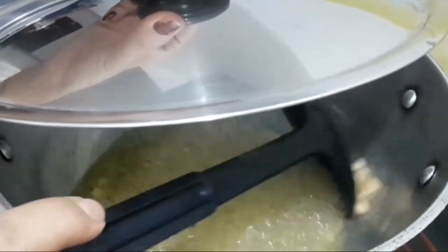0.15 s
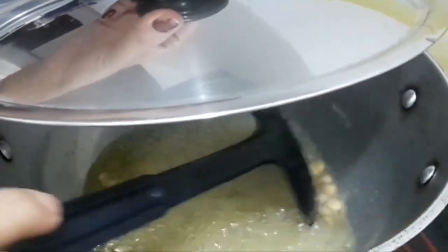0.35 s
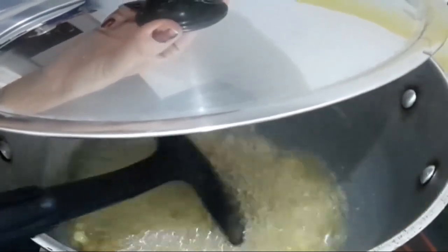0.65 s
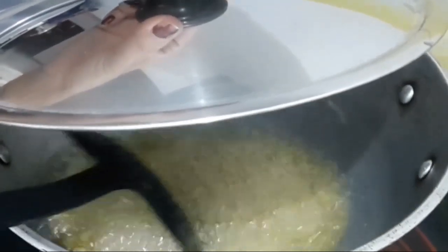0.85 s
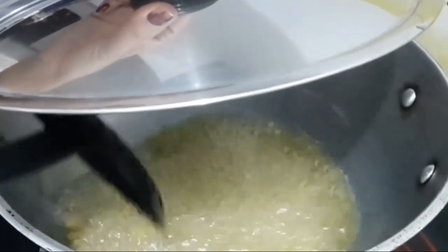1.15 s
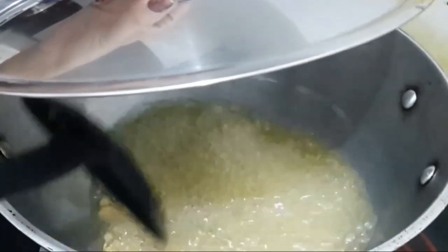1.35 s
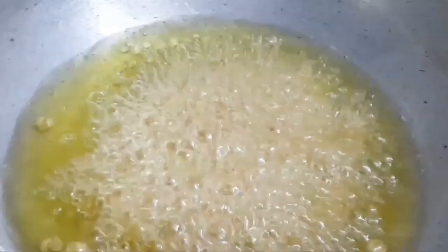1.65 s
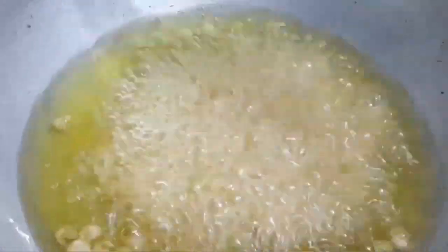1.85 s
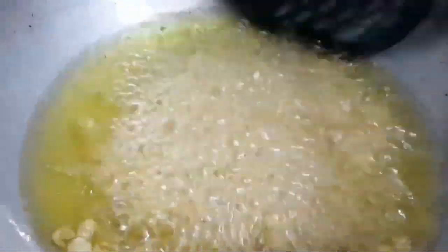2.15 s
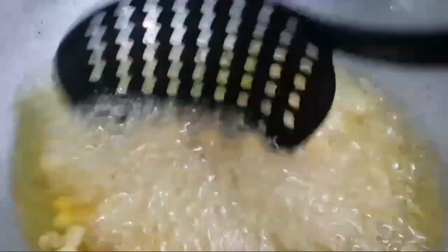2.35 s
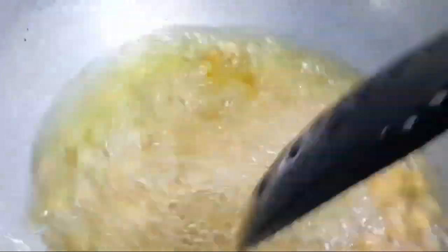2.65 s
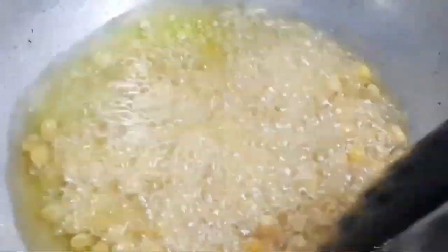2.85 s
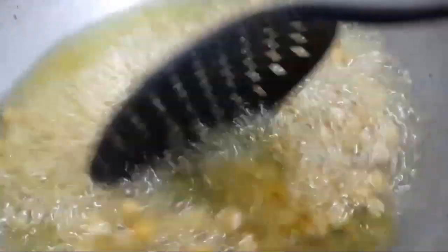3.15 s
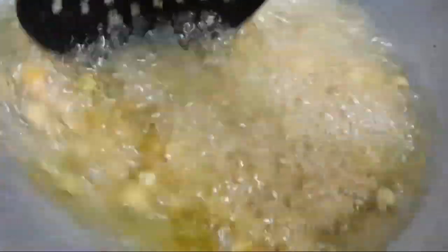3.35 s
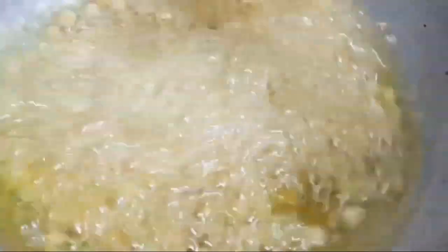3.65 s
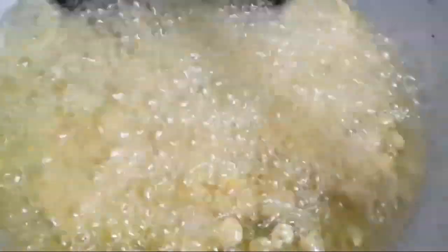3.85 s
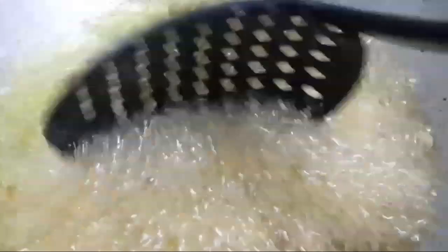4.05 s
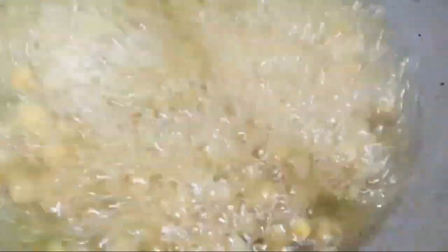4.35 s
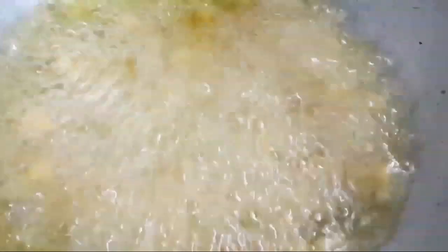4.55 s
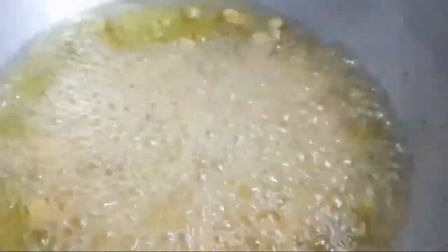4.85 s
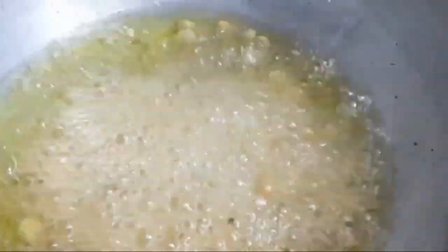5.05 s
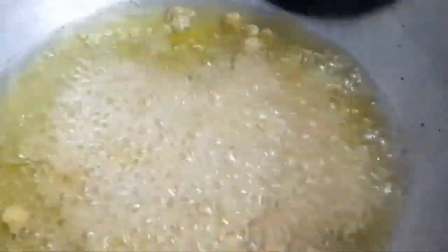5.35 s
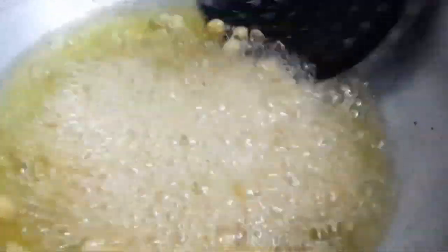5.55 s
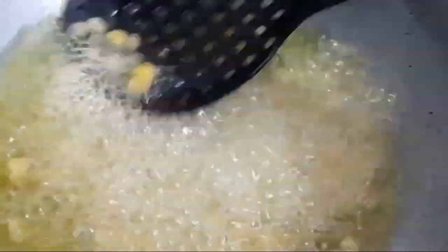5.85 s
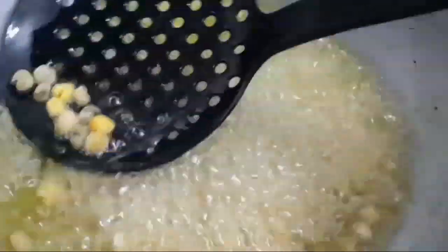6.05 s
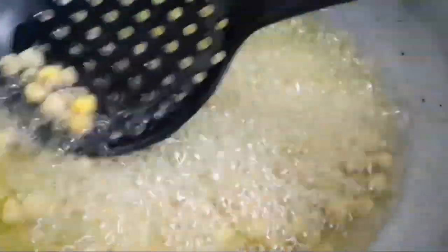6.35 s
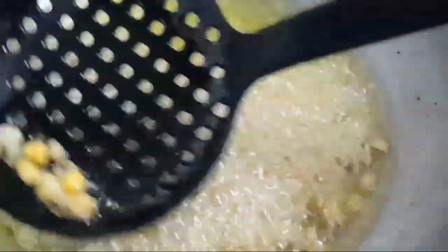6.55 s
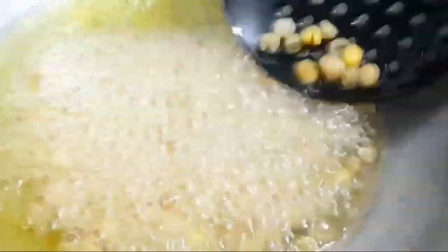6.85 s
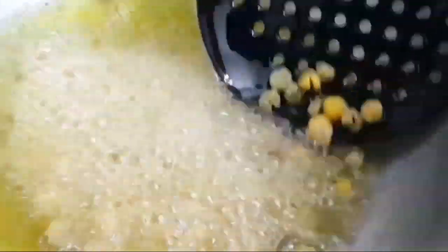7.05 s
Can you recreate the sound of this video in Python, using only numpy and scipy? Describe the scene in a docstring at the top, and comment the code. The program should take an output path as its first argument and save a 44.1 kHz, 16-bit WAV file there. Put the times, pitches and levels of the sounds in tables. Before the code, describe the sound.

From the start, small legumes deep-fry under the raised lid of a steel pot, close to the microphone and toward the left: a dense, rushing sizzle over hollow, low glugs. A spoon drags splashily through the oil in the first half second. At about 1.8 seconds the sound cuts to silence.

From 2 seconds the open pot fades in, much quieter, with a finer, brighter fizz. A plastic spoon ticks once against the steel near 2.3 seconds. Around 3.5 seconds the frying grows into a rolling crackle, still softer than the opening, dotted with tiny ringing pops, sharp spitting clicks and occasional oil plops. Stirring raises short sputters near 2.7 seconds, from 3.6 to 4, and most strongly from 5.5 to 5.9. The sizzle dips just after 6 seconds, then swells until the end at about 7.2. A very faint, low kitchen drone lies beneath the open pot.

```python
"""First, a dense rush over hollow glugs: small legumes deep-frying under the raised lid of a steel pot,
close to the left microphone port. The sound cuts to silence and fades back in on the open pot, where a
slotted spoon stirs the foam: steam bubbles fizz, larger ones pop and ring, water droplets spit.
One frying strength drives the fizz, the boil and the chance bursts; the loudest bursts have set times.
Behind the stove, the kitchen drones faintly."""
import sys
import numpy as np
from scipy import signal
from scipy.fft import rfft, irfft, next_fast_len
from scipy.io import wavfile
from scipy.ndimage import map_coordinates

SR = 44100
rng = np.random.default_rng(int(sys.argv[2]) if len(sys.argv) > 2 else 0)


def to_wav(s):
    """Save 16-bit WAV."""
    ch = np.atleast_2d(s).T  # columns
    pcm = np.round(np.clip(ch, -1, 1) * 32767)  # PCM
    wavfile.write(sys.argv[1], SR, pcm.astype(np.int16))


N = 317961
COVERED_S, OPEN_S = (0, 1.8), (2.1, 7.2)  # start and end of each spell of frying

# Frying strength under the lid, highest as the spoon sweeps through: (time [s], level [dB])
LID_STRENGTH = [(0, -23), (.12, -25), (.29, -22), (.39, -28), (.415, -24.5), (.48, -25.5), (.57, -26.5),
                (.75, -28), (1.07, -26), (1.17, -28), (1.4, -27.5), (1.77, -26.5)]
# Colour of the small bubbles under the lid, from close by: (frequency [Hz], gain [dB])
LID_FIZZ_COLOUR = [(1180, -33.5), (2000, -11.5), (2700, -7.5), (3670, -6.5), (5000, -3), (6900, 4),
                   (7600, -1), (8700, -8.5), (10500, -14.5), (15500, -18.5)]
# Colour of the large bubbles under the lid: (frequency [Hz], gain [dB])
LID_BOIL_COLOUR = [(15, -46.5), (25, -29), (117, -15.5), (172, -13.5), (208, -26.5), (248, -15.5),
                   (390, -11.5), (486, -7), (535, 1), (612, -2.5), (787, -8), (883, -15.5), (1050, -13.5),
                   (1270, -12.5), (1490, -3), (2500, -15.5), (3250, -56), (5500, -120)]
# Air resonances between oil and lid: (frequency [Hz], width [Hz], gain [dB])
LID_AIR_MODES = [(401, 37, -11), (558.5, 13, 3.5), (622, 40, 2.5), (790, 90, -3), (1294, 57, 1),
                 (1440, 25, -14.5), (1643, 18, 1.5)]
def under_lid():
    """Close on the covered pot: a dense rush over a hollow boil, and one sweep of the spoon."""
    strength_db, = curves(LID_STRENGTH)
    mean_db = strength_db[:round(COVERED_S[1] * SR)].mean()
    fizz_db = strength_db - 0.6 + 1.2 * wobble(13.75)
    boil_db = -38.5 + 0.42 * (strength_db - mean_db)
    rush = fizz(LID_FIZZ_COLOUR, rate=13000, spread_db=4, clump_db=1.7,
                snap_rate=690, snaps_db=-2, crackle_db=-13, comb_db=-5.5)
    hollow = boil(LID_BOIL_COLOUR, LID_AIR_MODES, rate=2500, spread_db=1.5, clump_db=1.3, modes_db=-1.5)
    return amp(fizz_db) * rush + amp(boil_db) * hollow + spoon_sweep()


# Frying strength in the open pot, up with stirring, down as food is lifted out: (time [s], level [dB])
OPEN_STRENGTH = [(2.24, -48.5), (2.42, -45.5), (2.9, -44.5), (3.08, -44), (3.278, -44), (3.53, -36.8),
                 (4.1, -36), (4.65, -35), (4.9, -36.5), (5.0, -38), (5.52, -35.5), (5.6, -38),
                 (5.76, -35.5), (5.82, -39.5), (6.15, -41.5), (6.47, -41), (6.6, -36.5), (6.87, -38),
                 (7.2, -33)]
# Colour of the small bubbles, open to the microphone: (frequency [Hz], gain [dB])
OPEN_FIZZ_COLOUR = [(1180, -25), (2000, -11), (2480, -6.5), (3400, -5), (3900, -3.5), (4550, -6.5),
                    (5220, -6), (7000, -3.5), (8100, -0.5), (8900, -2.5), (10150, 2.5), (11100, -3),
                    (12300, -8.5), (15500, -16.5)]
# Colour of the large bubbles in the open pot: (frequency [Hz], gain [dB])
OPEN_BOIL_COLOUR = [(140, -40), (230, -9), (265, -18), (375, -15.5), (449, -14), (543, -7.5), (851, -6),
                    (1090, 0), (1440, -5), (2010, -5), (2500, -7.5), (3250, -9), (5500, -120)]
# Air resonances of the open pot: (frequency [Hz], width [Hz], gain [dB])
OPEN_AIR_MODES = [(387.4, 62, -7), (553, 26, -5), (980, 41, -4), (1170.5, 8.9, 2.5), (1538, 12, 0.5),
                  (2030, 88, -5)]
def open_pot(knee_db=-38.5, boil_slope=1.72):
    """Close on the open pot: quieter, finer, brighter foam, and a boil that grows until it rolls."""
    strength_db, = curves(OPEN_STRENGTH)
    fizz_db = strength_db + 1.25 + 0.95 * wobble(22)
    # Below the knee the boil loses boil_slope dB per dB of strength.
    boil_db = -41.5 - 10 * np.log10(1 + amp(boil_slope * (knee_db - strength_db)) ** 2)
    foam = fizz(OPEN_FIZZ_COLOUR, rate=12000, spread_db=0.2, clump_db=1.3,
                snap_rate=110, snaps_db=-8, crackle_db=-9, comb_db=-4.5)
    simmer = boil(OPEN_BOIL_COLOUR, OPEN_AIR_MODES, rate=5000, spread_db=3, clump_db=1.3, modes_db=-5.5)
    return amp(fizz_db) * foam + amp(boil_db) * simmer + sputter() + plops() + spoon_tap()


def fizz(colour, rate, spread_db, clump_db, snap_rate, snaps_db, crackle_db, comb_db):
    """Countless tiny steam bubbles burst in clumps; larger ones snap and ring among them."""
    clumps = bursts(rate, spread_db) * amp(clump_db * wobble(70))
    foam = in_pot(clumps, t60=.011, walls_db=-2.5)
    snaps = in_pot(bursts(snap_rate, spread_db=3.5), t60=.018, walls_db=-0.5)
    rings = crackle(rate=450, low_hz=4200, high_hz=13000, cycles=5, spread_db=3.5)
    paths = unit(foam) + amp(snaps_db) * snaps + amp(crackle_db) * np.array([rings, steel_comb(rings)])
    combed = np.array([steel_comb(path, t60=.084) for path in paths])
    return unit(coloured(paths + amp(comb_db) * combed, colour))


def boil(colour, modes, rate, spread_db, clump_db, modes_db):
    """Large bubbles break the surface and ring the air in the pot."""
    blows = bursts(rate, spread_db) * amp(clump_db * wobble(80))
    body = unit(coloured(in_pot(blows, t60=.014, walls_db=-3), colour))
    hollow = unit(resonating(in_pot(blows, t60=.018, walls_db=12), modes))
    return unit(body + amp(modes_db) * hollow)


# Loudest ringing bubbles in the open pot: (time [s], relative level [dB], pitch [Hz])
LOUD_POPS = [(2.3449, -35, 5530), (2.4549, -35.5, 6040), (2.7656, -30, 8000), (2.9406, -32.5, 8100),
             (2.9969, -26, 6970), (3.0034, -31, 3550), (3.1754, -29, 7070), (3.3207, -22, 9500),
             (3.4095, -30.5, 5660), (3.4588, -24, 10800), (3.4998, -20.5, 7300), (3.527, -21, 9500),
             (3.5621, -23, 8600), (3.8584, -22.5, 5650), (3.9792, -21.5, 6420), (4.0067, -23, 9700),
             (4.0564, -26, 10900), (4.0672, -26, 10600), (4.0975, -28, 5900), (4.1392, -24.5, 4930),
             (4.1939, -29, 8200), (4.1991, -22, 8100), (4.2639, -29, 10000), (4.2761, -21, 9600),
             (4.3036, -26, 10100), (4.3493, -31.5, 3900), (4.586, -18, 10160), (4.7177, -26, 6660),
             (4.7721, -32, 3740), (4.7895, -24, 8600), (4.9225, -23, 10500), (4.9583, -32, 5050),
             (5.1493, -20, 8300), (5.1493, -28, 4080), (5.2789, -27, 7100), (5.2991, -22, 6400),
             (5.3109, -18, 8500), (5.3668, -26.5, 3730), (5.5319, -29, 4240), (5.5563, -23.5, 9240),
             (5.7377, -26, 9200), (5.7687, -15.5, 9650), (5.8316, -22.5, 10400), (5.8567, -25, 9400),
             (5.9934, -22, 7470), (6.0298, -23.5, 9100), (6.0657, -20, 7860), (6.0685, -33, 2790),
             (6.2269, -26, 10050), (6.357, -27.5, 10350), (6.404, -34, 9800), (6.5102, -25, 8500),
             (6.5298, -20.5, 9400), (6.5621, -24.5, 9200), (6.625, -30, 5840), (6.7163, -27, 8950),
             (6.7798, -22.5, 9270), (6.9192, -25, 8400), (6.9508, -21, 7760), (6.9508, -27.5, 3680),
             (6.981, -27, 8800), (7.0015, -21.5, 8400), (7.0121, -27, 4880), (7.0223, -20.5, 6500),
             (7.0293, -22, 9540), (7.1444, -21, 5180), (7.1966, -24.5, 9200)]
# Colour of a tearing bubble film: (frequency [Hz], gain [dB])
CRACK_COLOUR = [(200, -43), (1200, -28), (4000, -12.5), (9800, 16), (13000, -1.5), (16000, -27)]
def pops():
    """Big bubbles crack open, ring and splinter; lesser ones burst at random among them."""
    fine = strays(OPEN_S, OPEN_STRENGTH, rate=16, over_db=8, spread_db=6, low_hz=7500, high_hz=11500)
    coarse = strays(OPEN_S, OPEN_STRENGTH, rate=8, over_db=-1.5, spread_db=4, low_hz=3400, high_hz=7000)
    events = np.vstack([LOUD_POPS, fine, coarse])
    cracks = coloured(in_pot(clicks(events), t60=.021, walls_db=5), CRACK_COLOUR)
    shards = splinters(events, delay_s=.005, detune=.14, loss_db=11)
    tones = bubbles(np.vstack([events, shards]), cycles=4.8, rise=.08, tail_db=-12, t60=.045)
    return amp(8) * tones + amp(5.5) * cracks


# Loudest droplets spitting near the microphone: (time [s], relative level [dB])
LOUD_SPITS = [(0.3341, -17), (1.4294, -17), (1.5774, -17), (2.0935, -19.5), (2.3318, -19), (2.4971, -19.5),
              (2.5617, -15), (2.6334, -12.5), (2.656, -18), (2.6858, -19.5), (2.708, -25), (2.7125, -16.5),
              (3.3199, -29), (3.4701, -12.5), (3.5441, -17), (3.5808, -27), (3.785, -17), (3.9808, -11),
              (4.123, -16), (4.3861, -18), (4.958, -25), (5.3667, -15), (5.6888, -13), (5.7629, -19),
              (5.7904, -19), (5.879, -24), (5.9462, -15), (5.9859, -14), (6.0657, -14), (6.2941, -15),
              (6.5689, -16), (6.9087, -18), (6.981, -18), (7.0015, -19), (7.0325, -16)]
# Colour of their dry snap: (frequency [Hz], gain [dB])
SPIT_COLOUR = [(200, -50.5), (1200, -15.5), (4000, -8), (9800, 7.5), (15000, -2)]
def spits():
    """Water droplets flash to steam, one sharp click each, over a patter of weaker ones."""
    covered = strays(COVERED_S, LID_STRENGTH, rate=5, over_db=5, spread_db=3)
    uncovered = strays(OPEN_S, OPEN_STRENGTH, rate=24, over_db=12.5, spread_db=9)
    flashes = clicks(LOUD_SPITS) + clicks(covered) + clicks(uncovered)
    return amp(6) * coloured(in_pot(flashes, t60=.014, walls_db=-5), SPIT_COLOUR)


# Largest bubbles heaving up under the lid, then a few faint knocks of the stirring spoon in the open pot: (time
# [s], relative level [dB], pitch [Hz])
LOUD_GLUGS = [(.03, -33, 610), (.2, -21, 619), (.229, -25, 620), (.288, -24, 620), (.412, -29, 613),
              (.508, -15.5, 585), (.531, -20, 630), (.627, -19, 594), (.67, -19.5, 590), (.708, -22, 550),
              (.865, -20, 593), (1.147, -28, 620), (1.2, -16, 605), (1.249, -21.5, 546),
              (1.273, -19.5, 615), (1.386, -20.5, 540), (1.514, -21, 616), (1.643, -24, 627),
              (1.708, -21, 606), (2.751, -40, 541), (2.882, -39, 550), (3.865, -36, 570)]
# What the pot's air passes on to the microphone: (frequency [Hz], gain [dB])
HOLLOW_COLOUR = [(100, -21.5), (450, -2.5), (900, -2), (3000, -20.5)]
def glugs():
    """Each large bubble, or a light knock of the spoon, sounds a short note in the pot's hollow; lesser ones
    heave under the lid."""
    lesser = strays(COVERED_S, LID_STRENGTH, rate=26, over_db=-2.5, spread_db=3, low_hz=550, high_hz=660)
    notes = bubbles(np.vstack([LOUD_GLUGS, lesser]), cycles=3, rise=.03, tail_db=-21, t60=.045)
    return amp(-0.6) * coloured(notes, HOLLOW_COLOUR)


# Spoon strokes in the open pot: (middle time [s], length [s], level [dB])
STIRS = [(2.436, 0.019, -42), (2.677, 0.1, -40), (3.67, 0.2, -37), (3.913, 0.088, -36), (5.065, .03, -39),
         (5.547, 0.074, -36.5), (5.716, 0.069, -32), (5.783, 0.035, -26.5), (5.887, 0.093, -35.5),
         (7.089, 0.033, -33)]
# Colour of a flurry of bursts: (frequency [Hz], gain [dB])
SPUTTER_COLOUR = [(200, -46), (1200, -9), (3500, 0.5), (5500, -1), (7000, -1.5), (10100, 12), (12300, 2.5),
                  (16000, -6)]
def sputter():
    """The spoon pushes wet food under, freeing a flurry of coarse bursts and ringing bubbles."""
    stirring = sum(stroke(*stir) for stir in STIRS)
    rings = crackle(rate=500, low_hz=4000, high_hz=12000, cycles=5, spread_db=3)
    coarse = in_pot(bursts(rate=900, spread_db=4.5), t60=.016, walls_db=2)
    flurry = coarse + amp(-1) * np.array([rings, steel_comb(rings)])
    return stirring * unit(coloured(flurry, SPUTTER_COLOUR))


# Loudest low plops in the open pot: (time [s], relative level [dB], pitch [Hz])
LOUD_PLOPS = [(2.9964, -27.5, 1170), (3.4795, -21, 1170), (4.8436, -21, 2140), (5.898, -20.5, 2120),
              (5.9264, -20.5, 1900), (6.3824, -26, 1870), (6.5801, -17, 1510), (6.6646, -19, 1840),
              (7.093, -17.5, 2490)]
# Colour of slapped oil: (frequency [Hz], gain [dB])
SPLASH_COLOUR = [(250, -26), (1100, 7), (3000, 10.5), (8000, -20), (15000, -12)]
def plops():
    """Stirred and dripping oil slaps back into the pot."""
    lesser = strays(OPEN_S, OPEN_STRENGTH, rate=3, over_db=5, spread_db=6, low_hz=930, high_hz=2340)
    events = np.vstack([LOUD_PLOPS, lesser])
    splash = coloured(in_pot(clicks(events), t60=.014, walls_db=-1), SPLASH_COLOUR)
    tones = bubbles(events, cycles=1.8, rise=.1, tail_db=-11, t60=.049)
    return amp(-4) * tones + amp(5) * splash


# Colour of oil dragged under the lid: (frequency [Hz], gain [dB])
SWEEP_COLOUR = [(250, -38.5), (1050, 3.5), (1300, 4.5), (1650, 8.5), (2000, 3), (3000, 0), (5200, 6),
                (8000, -11.5)]
def spoon_sweep():
    """The spoon drags through the oil under the lid and stirs up a coarse splashing."""
    splashing = in_pot(bursts(rate=1500, spread_db=6.5), t60=.012, walls_db=-2.5)
    return stroke(middle_s=.19, length_s=.41, db=-33.5) * unit(coloured(splashing, SWEEP_COLOUR))


# Colour of the spoon's edge striking the pot: (frequency [Hz], gain [dB])
TAP_COLOUR = [(500, -38), (1200, -20), (2000, -8), (3600, -6), (5500, -7), (8000, -1), (10300, 1),
              (11500, -12), (13000, -24)]
def spoon_tap(at_s=2.2636, strike_db=-2.5):
    """Hard plastic meets steel in one dry tick as the spoon dips in."""
    return coloured(in_pot(clicks([(at_s, strike_db)]), t60=.005, walls_db=-9), TAP_COLOUR)


# Colour of the kitchen's room tone: (frequency [Hz], gain [dB])
ROOM_COLOUR = [(25, 6), (60, -6.5), (125, 1), (150, -3), (175, 12.5), (205, -15), (400, -14), (2000, -45)]
def kitchen():
    """Farther off, behind the stove: a faint, low, steady drone."""
    return amp(-66.5) * unit(coloured(rng.standard_normal((2, N)), ROOM_COLOUR))


def stroke(middle_s, length_s, db):
    """The flat-topped swell of one spoon stroke."""
    return amp(db) * np.exp(-(2 * (np.arange(N) / SR - middle_s) / length_s) ** 4)


def bursts(rate, spread_db):
    """Bubble films tear at random, about rate times a second: many weak, a few strong."""
    sizes = amp(spread_db * np.clip(rng.standard_normal(N), -3, 2))
    return unit((rng.random(N) < rate / SR) * sizes * rng.choice([-1, 1], N))


def strays(span, strength, rate, over_db, spread_db, low_hz=2000, high_hz=12000):
    """Chance bursts whose level follows the frying: (time [s], level [dB], pitch [Hz])."""
    start, end = span
    when, size, pitch = rng.random((256, 3))[:int(rate * (end - start))].T
    times = start + when * (end - start)
    db = np.interp(times, *np.transpose(strength)) + over_db + spread_db * (size - .5)
    return np.column_stack([times, db, low_hz * (high_hz / low_hz) ** pitch])


def splinters(events, delay_s, detune, loss_db, count=2):
    """A torn bubble breaks into smaller ones that ring just after it, weaker and off its pitch."""
    times, db, hz = np.transpose(events)[:, :, None]
    late, off = rng.random((len(times), count, 2)).transpose(2, 0, 1)
    columns = [times + delay_s * late, db - loss_db * (.5 + late), hz * np.exp(detune * (2 * off - 1))]
    return np.stack(columns, axis=-1).reshape(-1, 3)


def ring(hz, cycles, rise, size=512):
    """One row per bubble: a short damped tone whose pitch rises as the cavity opens."""
    turns = hz[:, None] * np.arange(size) / SR
    age = turns / cycles
    tone = np.sin(2 * np.pi * turns * (1 + rise * age / (1 + age)))
    return tone * np.exp(-age) * (1 - np.exp(-turns))


def crackle(rate, low_hz, high_hz, cycles, spread_db):
    """A crowd of bubbles of all sizes rings at random moments."""
    when, pitch, chance = rng.random((4096, 3))[:int(rate * N / SR)].T
    tones = ring(low_hz * (high_hz / low_hz) ** pitch, cycles, rise=.1)
    sizes = amp(-spread_db * np.log(chance + .007))
    samples = (when * N).astype(int)[:, None] + np.arange(tones.shape[1])
    return unit(np.bincount(samples.ravel(), (tones * sizes[:, None]).ravel())[:N])


def bubbles(events, cycles, rise, tail_db, t60, size=2048):
    """Single bubbles ring at their own pitch; the pot keeps each pitch alive a little longer."""
    out, t = np.zeros((2, N + size)), np.arange(size) / SR
    tones = ring(np.array(events)[:, 2], cycles, rise, size)
    for (at_s, db, hz), tone in zip(events, tones):
        beats = signal.resample(rng.standard_normal((2, size // 40)), size, axis=1)
        envelope = amp(-60 * t / t60) * (1 - np.exp(-t / .001))
        tail = beats * np.sin(2 * np.pi * hz * t) * envelope
        out[:, round(at_s * SR):][:, :size] += amp(db) * (tone + amp(tail_db) * tail)
    return out[:, :N]


def clicks(events):
    """One impulse for each (time [s], level [dB]) row."""
    times, db = np.transpose(events)[:2]
    return np.bincount(np.round(times * SR).astype(int), amp(db), N)


def in_pot(x, t60, walls_db):
    """Two paths from oil to microphone: straight with the walls' answer, and scattered only."""
    straight = (x + amp(walls_db) * echoes(x, t60)) / np.hypot(1, amp(walls_db))
    return np.array([straight, echoes(x, t60)])


def echoes(x, t60):
    """Dense reflections: each click leaves noise of equal energy that falls 60 dB in t60 seconds."""
    keep = np.exp(-np.log(1e6) / (t60 * SR))
    energy = signal.lfilter([1 - keep], [1, -keep], x ** 2)
    return np.sqrt(energy) * rng.standard_normal(N)


def steel_comb(x, t60=.057, count=60, size=1024):
    """Close reflections off the steel comb the treble into many narrow peaks."""
    delays = rng.integers(size // 32, size, count)
    gains = rng.choice([-1, 1], count) * amp(-60 * delays / SR / t60)
    taps = np.diff(np.bincount(delays, gains, size), prepend=0)
    return signal.oaconvolve(x, taps / np.linalg.norm(taps))[:len(x)]


def resonating(x, modes):
    """The pot's air rings in band-pass resonances of alternating sign."""
    return filtered(x, lambda f: sum(
        (-1) ** k * amp(db) * 1j * f * width / (centre ** 2 - f ** 2 + 1j * f * width)
        for k, (centre, width, db) in enumerate(modes)))


# Likeness of the two microphone ports, clipped to 0..1 in use: (frequency [Hz], likeness [ratio])
PORT_LIKENESS = [(60, 1), (130, 0.8), (290, 0.95), (640, 0.8), (1410, 0.4), (3100, -10), (6820, 0.67),
                 (15000, -1)]
def microphone(paths, balance, lag_s=.0001):
    """The left port faces the oil; the right one shares its bass but gets weak, scattered treble."""
    size = next_fast_len(N + 8192, True)
    hz = np.fft.rfftfreq(size, 1 / SR)
    straight, scattered = rfft(paths, size)
    alike = np.clip(along(PORT_LIKENESS, hz), 0, 1)
    right_gain = amp(-along(balance, hz))
    delayed = np.exp(-2j * np.pi * hz * lag_s) * straight
    right = right_gain * (alike * delayed + np.sqrt(1 - alike ** 2) * scattered)
    trim = 2 / np.sqrt(1 + right_gain ** 2 + 2 * alike * right_gain)  # ports' mean stays near source level
    return irfft(trim * np.array([straight, right]), size)[:, :N]


def amp(db):
    """Decibels to gain."""
    return 10 ** (np.asarray(db) / 20)


def unit(x):
    """x at rms 1."""
    return x / np.sqrt(np.mean(x ** 2) + 1e-20)


def along(points, hz):
    """(frequency [Hz], value) points read on a log axis."""
    knots_hz, values = np.transpose(points)
    return np.interp(np.log(hz + 1), np.log(knots_hz + 1), values)


def curves(rows):
    """One value per sample for each column after the time."""
    times, *columns = np.transpose(rows)
    return [np.interp(np.arange(N) / SR, times, column) for column in columns]


def wobble(rate):
    """A smooth random curve, rate knots a second."""
    knots = rng.standard_normal(int(N * rate / SR) + 4)
    return map_coordinates(knots, [np.arange(N) * rate / SR])


def filtered(x, response):
    """x through a frequency response."""
    size = next_fast_len(N + 8192, True)
    return irfft(rfft(x, size) * response(np.fft.rfftfreq(size, 1 / SR)), size)[..., :N]


def coloured(paths, colour, size=4096):
    """Both paths through a minimum-phase filter, so that attacks stay sharp."""
    gain = amp(along(colour, np.fft.rfftfreq(size, 1 / SR)))
    cepstrum = irfft(np.log(gain + 1e-5))
    cepstrum[1:size // 2] *= 2
    cepstrum[size // 2 + 1:] = 0
    impulse = irfft(np.exp(rfft(cepstrum)))
    return signal.oaconvolve(paths, impulse[None], axes=1)[:, :N]


# Left port over right, beside the covered pot: (frequency [Hz], level difference [dB])
LID_LEFT_BIAS = [(120, -2), (380, 3), (1290, 3.5), (2380, 4), (4400, 11), (7500, 23), (10500, 10.5),
                 (15000, 9.5)]
# Left port over right, beside the open pot: (frequency [Hz], level difference [dB])
OPEN_LEFT_BIAS = [(120, 0.5), (380, 1.3), (1290, 4.7), (2380, 3.4), (4400, 5.6), (8120, 15.6),
                  (10000, 27.7), (15000, 15)]
def scene(cut_s=1.794, resume_s=2.0, fade_s=.25):
    """At the stove, pot close on the left: covered, a short silence, then open, with room tone."""
    t = np.arange(N) / SR
    cut_off = np.exp(-np.maximum(t - cut_s, 0) / .0049)
    pot_fade = np.clip((t - resume_s) / fade_s, 0, 1)
    room_fade = np.clip((t - resume_s) / 2.1, 0, 1)
    single_bursts = pops() + spits() + glugs()
    covered = microphone(under_lid() + single_bursts, LID_LEFT_BIAS) * cut_off
    uncovered = microphone(open_pot() + single_bursts, OPEN_LEFT_BIAS) * pot_fade
    drone = microphone(kitchen(), OPEN_LEFT_BIAS) * room_fade
    return covered + uncovered + drone


def record(dry, top_hz=15700, edge_hz=500):
    """The treble ends steeply at the band limit."""
    return filtered(dry, lambda hz: np.clip((top_hz - hz) / edge_hz + .5, 0, 1) ** 2)


dry = scene()
out = record(dry)
to_wav(out)
```